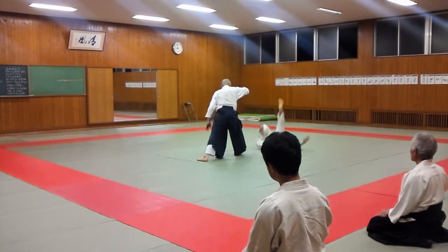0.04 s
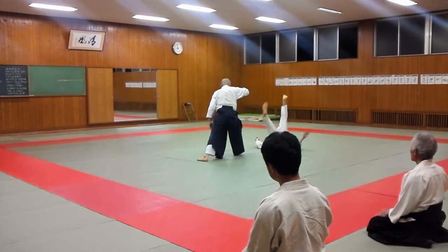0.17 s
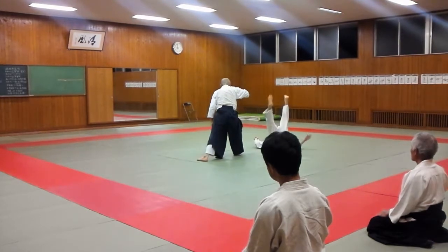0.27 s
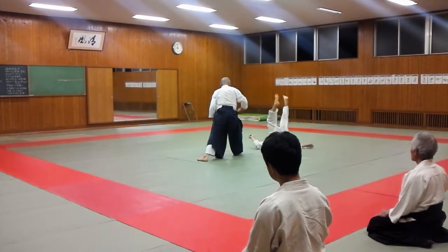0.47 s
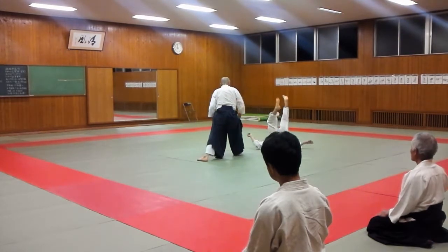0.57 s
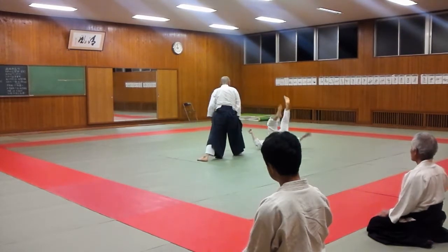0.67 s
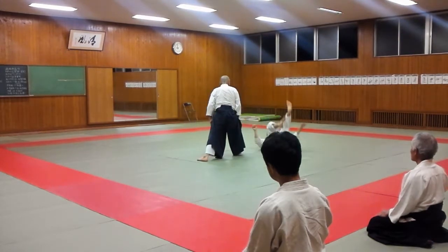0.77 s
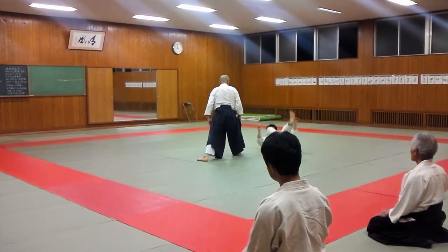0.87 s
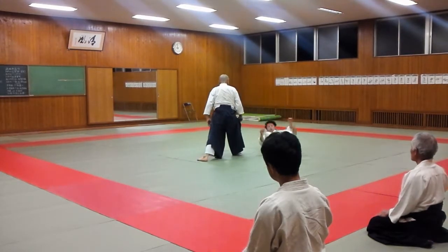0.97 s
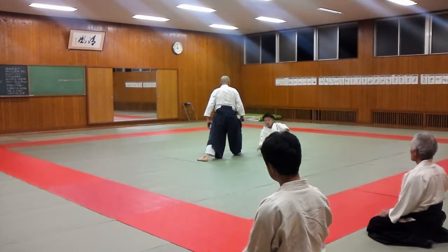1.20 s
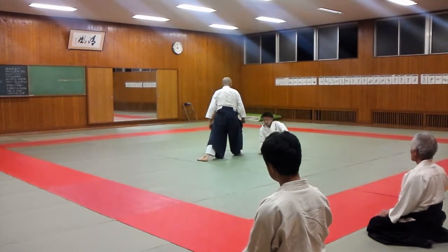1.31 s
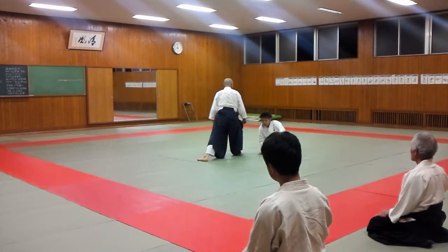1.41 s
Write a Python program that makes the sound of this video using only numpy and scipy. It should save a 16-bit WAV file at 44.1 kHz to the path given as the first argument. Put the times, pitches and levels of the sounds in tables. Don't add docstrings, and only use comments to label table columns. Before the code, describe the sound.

Loud breakfall on floor mats, sharp arm slap and heavy thump, echoing away in a large hall.

```python
import sys
import numpy as np
from scipy import signal
from scipy.fft import rfft, irfft
from scipy.io import wavfile

SR = 44100
rng = np.random.default_rng(int(sys.argv[2]) if len(sys.argv) > 2 else 0)


def master_out(mix):
    frames = np.transpose(np.atleast_2d(mix))
    ceiling = np.clip(frames, -1, 1)
    pcm = np.round(ceiling * 32767).astype(np.int16)
    wavfile.write(sys.argv[1], SR, pcm)


def decibels_to_gain(level_db):
    exponent = np.asarray(level_db, float) / 20
    return 10 ** exponent


N = 63945
T = np.arange(N) / SR
F = np.fft.rfftfreq(N, 1 / SR)
FALL_S = .246


def read(table, hz):
    table = np.array(table)
    return np.interp(np.log(hz + 1), np.log(table[:, 0]), table[:, 1])


def unit(x):
    return x / np.sqrt(np.mean(x ** 2))


def noise(gain):
    return irfft(rfft(rng.standard_normal(N)) * gain, N)


def peak(hz, width_hz):
    return 1 / (1 + 1j * (F ** 2 - hz ** 2) / (F * width_hz + 1))


def fade(start, rise, t60):
    t = np.maximum(T - start, 0)
    return (1 - np.exp(-t / rise)) * np.exp(-np.log(1000) * t / t60)


# start in seconds, level in dB, decay time in seconds.
SLAP_HITS = [(.2428, -16, .0015), (.2452, -8, .003), (.2495, -12, .003), (.2530, -11, .0025),
             (.2645, -22, .004), (.2790, -15, .003), (.2820, -8.5, .003), (.2900, -14, .005),
             (.3030, -19, .004), (.322, -22, .008), (.345, -24, .008), (.366, -23, .01), (.42, -28, .01),
             (1.4335, -48, .006), (1.4405, -50, .008)]
# frequency in Hz, gain in dB.
SLAP_COLOUR = [(200, -9.5), (480, 1.5), (900, -3), (2000, -3.5), (4500, -6), (8000, -2.5), (10500, -2),
               (15000, -16.5)]


def slaps():
    rise_s = .0005
    envelope = 0
    for start, db, length in SLAP_HITS:
        t60 = np.log(1000) * length
        envelope = envelope + decibels_to_gain(db) * fade(start, rise_s, t60)
    crackle = unit(noise(decibels_to_gain(read(SLAP_COLOUR, F))))
    return envelope * crackle


# start in seconds, level in dB, pitch in Hz (negative flips polarity), swell time in seconds.
BODY_THUMPS = [(-.012, -24, 46.5, 0.015), (0.031, -39.5, 97, 0.031), (0.126, -29, 33, 0.033),
               (0.2429, -10.5, 356, 0.0034), (.2440, -10.5, 100, 0.0048), (.2490, -13.5, -440, 0.0029),
               (0.2531, -5.5, 101.5, 0.0091), (0.2837, -7.5, -125, 0.0038), (0.294, -25.5, 60, 0.043),
               (.3110, -8, 91, 0.0055), (.3350, -11.5, -100, 0.0074), (0.339, -21, 143.5, 0.012),
               (.3490, -6.5, -79, 0.0093), (0.362, -8, 88, 0.0072), (0.403, -14.5, -105, 0.0048),
               (0.426, -18, -105, 0.01), (.4450, -22, 132, 0.011), (0.481, -21, 101, .015),
               (0.508, -25, 60, 0.034), (0.568, -37, 89.5, 0.028), (.6000, -31.5, 111, 0.023),
               (0.692, -37, 89, 0.02), (1.433, -47, 351, 0.0022), (1.437, -49, 480, .006)]


def thumps():
    out = 0
    for start, db, hz, swell in BODY_THUMPS:
        u = np.maximum(T - start, 0) / swell
        envelope = u * np.exp(.5 - u ** 2 / 2)
        out = out + decibels_to_gain(db) * envelope * np.sin(2 * np.pi * hz * (T - start))
    return out


# frequency in Hz, level in dB, t60 in seconds.
BOOM_MODES = [(40.4, -34, .9), (54, -33, 0.71), (105.8, -32.5, 1.6), (156.6, -29.5, 1.52), (205.5, -22, .7),
              (262, -25, 0.72), (332.3, -26.5, 0.64), (425, -22.5, 0.71)]


def boom():
    rise_s = 0.028
    out = 0
    for hz, db, t60 in BOOM_MODES:
        phase_turns = rng.random()
        tone = np.sin(2 * np.pi * (hz * (T - FALL_S) + phase_turns))
        out = out + decibels_to_gain(db) * fade(FALL_S, rise_s, t60) * tone
    return out


# start in seconds, level in dB, build-up in seconds.
HALL_BLOWS = [
    (-.35, -28, .03),
    (0.244, -15.5, 0.025),
    (1.433, -57, 0.0079),
]
# frequency in Hz, gain in dB.
HALL_COLOUR = [(40, -26), (110, 8.5), (350, 16), (700, 3), (1600, 2.5), (4000, -2.5), (10000, 0.5),
               (15000, -11.5)]
# frequency in Hz, t60 in seconds.
HALL_T60 = [(60, 0.69), (500, 1.027), (1000, 1.236), (2200, 1.68), (4000, 1.78), (7000, 1.377),
            (11000, 0.8), (15000, 0.7)]
# centre in Hz, width in Hz, level in
# dB, t60 in seconds.
WALL_PANELS = [(442, 118, -17, 1.2), (893, 160, -6.5, 0.59), (1532, 640, -17, 1.62), (2677, 440, -13, 2.04),
               (3700, 440, -16.5, 1.46)]


def ring(t60):
    steepen_db_s2 = 3
    out = 0
    for start, db, rise in HALL_BLOWS:
        level = decibels_to_gain(db - steepen_db_s2 * (T - start) ** 2)
        out = out + level * fade(start, rise, t60)
    return out


def hall():
    spectrum = rfft(unit(noise(decibels_to_gain(read(HALL_COLOUR, F)))))
    out = 0
    for k in range(29):
        hz = 30 * 2 ** (k / 3)
        bell = np.cos(np.pi / 2 * np.clip(3 * np.log2((F + 1) / hz), -1, 1)) ** 2
        out = out + ring(read(HALL_T60, hz)) * irfft(spectrum * bell, N)
    for hz, width_hz, db, t60 in WALL_PANELS:
        panel = unit(noise(peak(hz, width_hz) ** 2))
        out = out + decibels_to_gain(db) * ring(t60) * panel
    return out


# time in seconds, level in dB.
CLOTH_SWISH = [
    (0, -53),
    (0.059, -50),
    (.13, -52),
    (.19, -55.5),
    (.24, -62.5),
]


def cloth():
    centre_hz, width_hz = 9500, 5000
    s, db = np.array(CLOTH_SWISH).T
    level = decibels_to_gain(np.interp(T, s, db, right=-99))
    return level * unit(noise(peak(centre_hz, width_hz) ** 2))


def floor_sway():
    centre_hz, width_hz, level_db, t60_s = 38, 14, -41, 3.
    sway = unit(noise(peak(centre_hz, width_hz) ** 2))
    return decibels_to_gain(level_db) * fade(-0.0051, .001, t60_s) * sway


# multiple of the mains frequency, peak level in dB.
LAMP_HUM = [(1, -37), (3, -45), (5, -53), (7, -60), (9, -68), (11, -71)]


def hum():
    mains_hz, peak_s, lead_hz = 60, .01035, 25
    out = 0
    for k, db in LAMP_HUM:
        lead = np.arctan(lead_hz / (k * k * mains_hz))
        out = out + decibels_to_gain(db) * np.cos(2 * np.pi * k * mains_hz * (T - peak_s) + lead)
    return out


# frequency in Hz, gain in dB.
AIR_COLOUR = [(30, -3.5), (100, -21.5), (300, -22.5), (1000, -29.5), (3000, -33.5), (7000, -41.5),
              (10000, -37), (15500, -43.5)]


def air():
    level_db = -48
    return decibels_to_gain(level_db) * unit(noise(decibels_to_gain(read(AIR_COLOUR, F))))


def scene():
    fall = slaps() + thumps() + boom() + hall()
    background = cloth() + floor_sway() + hum() + air()
    return (fall + background)[None]


def microphone(x):
    hz, width_hz, level_db, clip = 10570, 1900, -0.5, .52
    x = irfft(rfft(x) * (1 + decibels_to_gain(level_db) * peak(hz, width_hz)), N)
    return x / (1 + np.abs(x / clip) ** 6) ** (1 / 6)


# time in seconds, top frequency in Hz.
BAND_CEILING = [(.22, 15800), (.24, 16700), (.26, 15900), (.41, 15800), (.425, 15000), (.51, 14900),
                (.52, 14400), (.62, 14300), (.63, 15000), (.7, 14900), (.72, 12600), (.745, 15700)]


def moving_top(x):
    hz, s, z = signal.stft(x, SR, nperseg=1024)
    top_hz = np.interp(s, *np.array(BAND_CEILING).T)
    z = z * (hz[:, None] < top_hz)
    return signal.istft(z, SR, nperseg=1024)[1][:, :N]


def roll_off(x):
    return signal.sosfilt(signal.butter(12, 16990, fs=SR, output="sos"), x)


def record(dry):
    mix = moving_top(microphone(dry))
    return roll_off(mix)


dry = scene()
out = record(dry)
master_out(out)
```